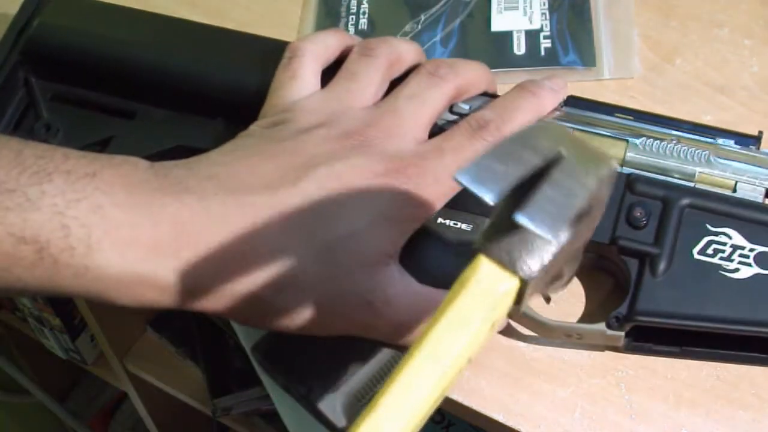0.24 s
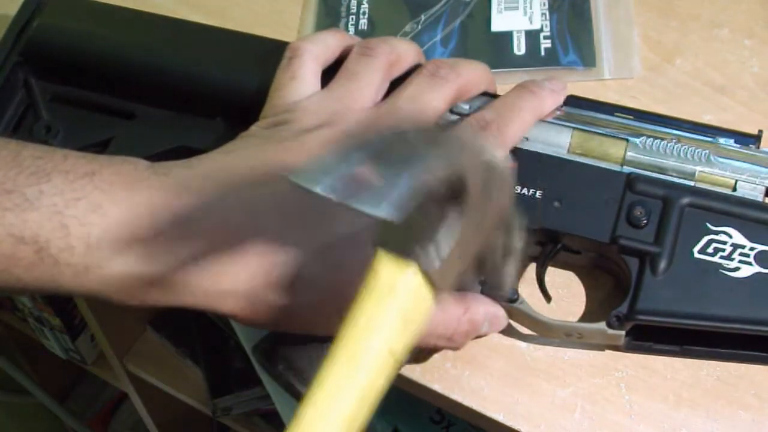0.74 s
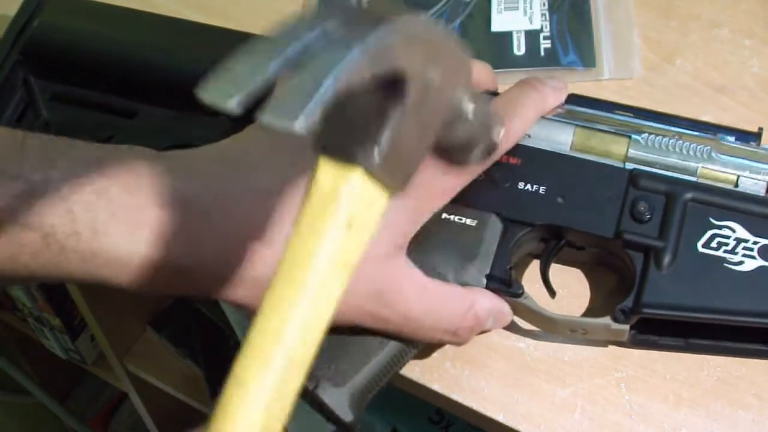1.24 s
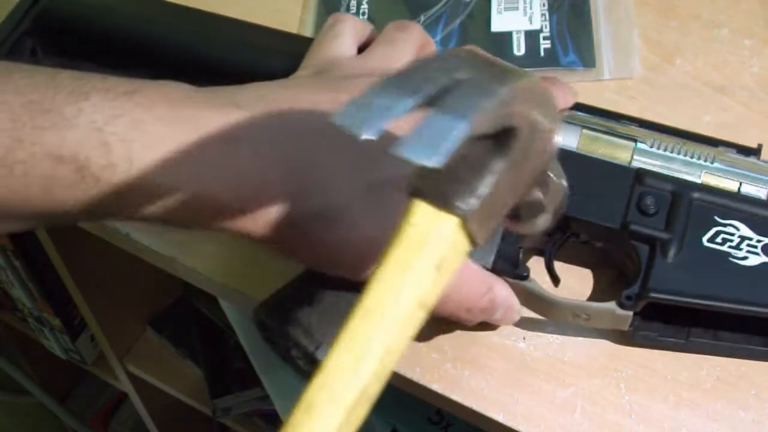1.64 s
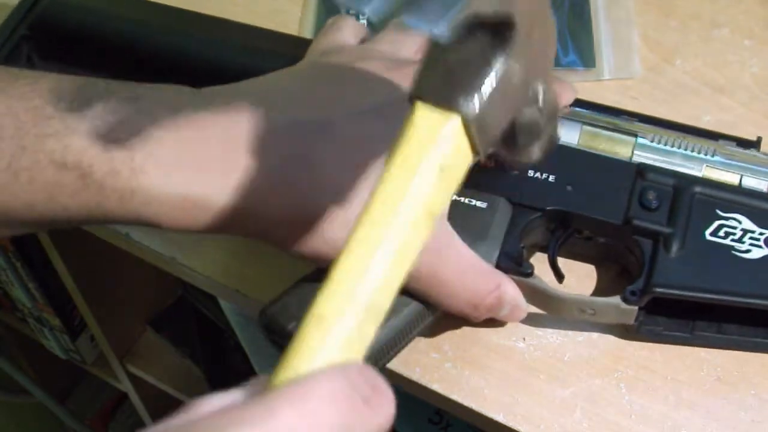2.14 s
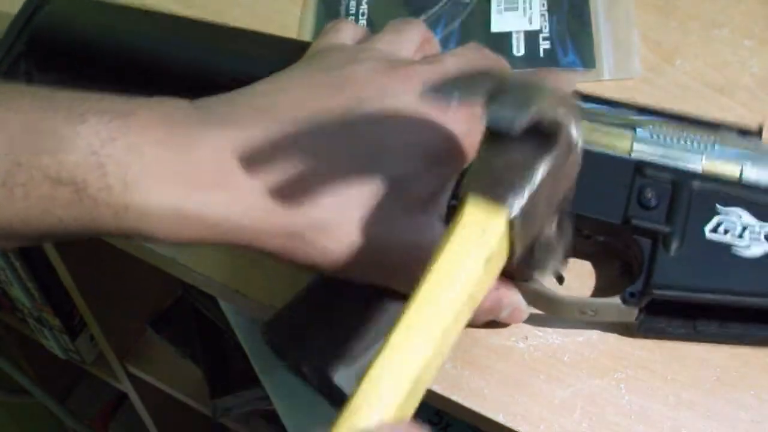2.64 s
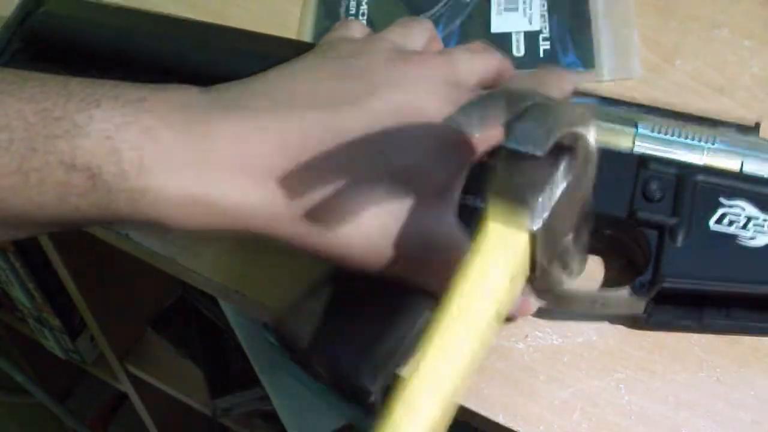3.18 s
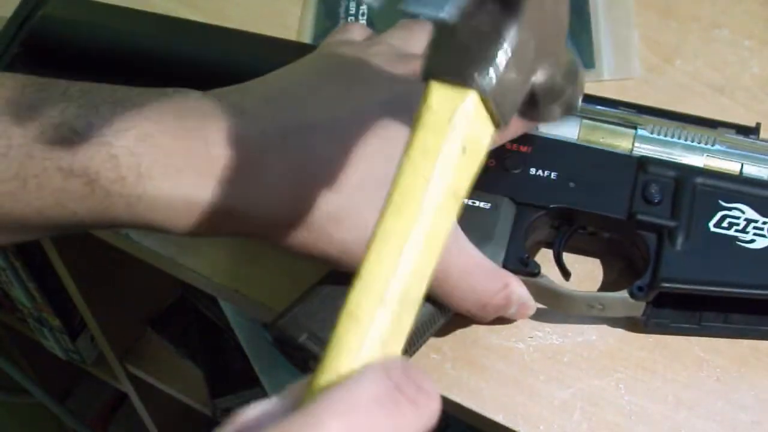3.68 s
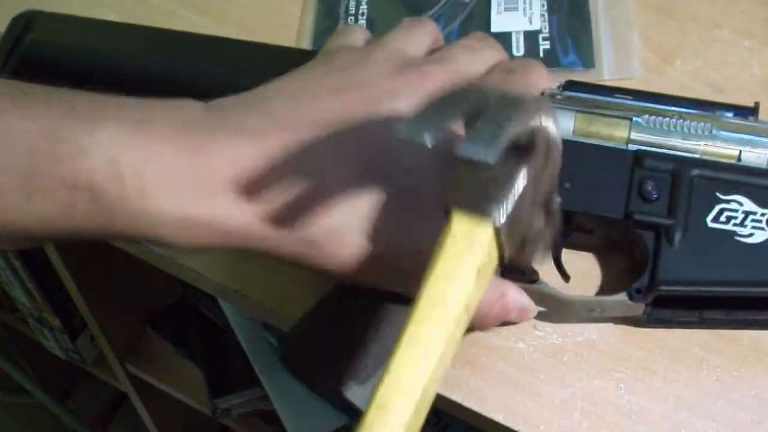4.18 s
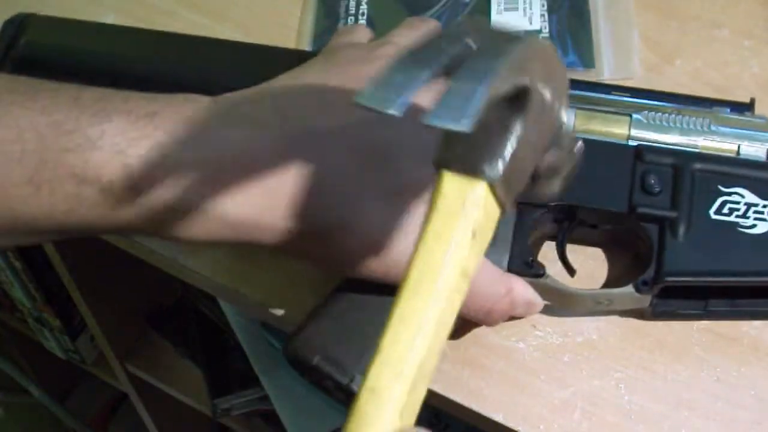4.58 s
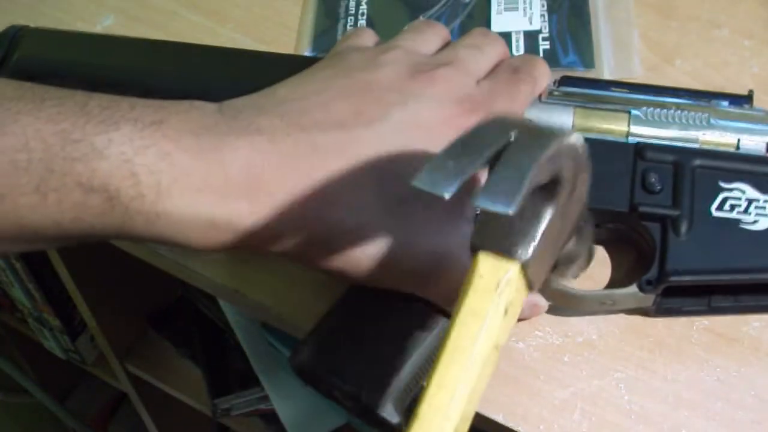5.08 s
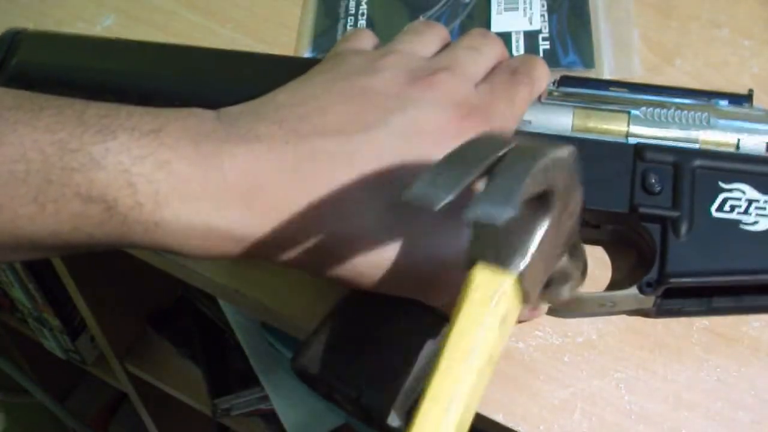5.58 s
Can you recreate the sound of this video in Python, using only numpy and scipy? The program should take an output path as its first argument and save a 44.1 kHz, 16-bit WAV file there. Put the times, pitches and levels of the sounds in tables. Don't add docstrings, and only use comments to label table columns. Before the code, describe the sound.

Close to the microphone in a small room, faint fingertip bumps shift a plastic housing on a wooden bench over low rumble and very faint electronic whine. At 0.4 s a hammer taps a small pin, then again at 0.7 and a heavier 1.0 s: dull hollow clatter with a low bench thump. A clackier blow comes at 1.35, then a pause with tiny handling knocks. Softer taps resume at 1.9 and continue every 0.3 s, turning sharper and more squarely struck from 3.1 s. After 3.6 s the steel rings harder. Blows at 4.1 and 4.4 have less plastic body but longer rattling tails; from 4.7 to 5.5 s come the loudest, fullest cracks, slightly overloaded, and a somewhat lighter last one at 5.8. Most strikes are followed within a tenth of a second by a softer plastic rebound. Tails are short, with a slight room ring.

```python
import sys
import numpy as np
from scipy import signal
from scipy.fft import rfft, irfft
from scipy.io import wavfile
from scipy.ndimage import uniform_filter1d

SR = 44100
rng = np.random.default_rng(int(sys.argv[2]) if len(sys.argv) > 2 else 0)


def convert_level_to_amplitude(level_db):
    exponent = np.asarray(level_db, float) / 20
    return 10 ** exponent


def wav_record(signal):
    frames = np.transpose(np.atleast_2d(signal))
    bounded = np.clip(frames, -1, 1)
    quanta = np.round(bounded * 32767).astype(np.int16)
    wavfile.write(sys.argv[1], SR, quanta)


N = 256662

# pitch_hz, width_hz, level_db
HOUSING_MODES = [(1049, 270, -2), (1286, 140, -4.5), (1622, 360, -5), (1974, 170, 0), (2317, 207, 2),
                 (2628, 84, -1.5), (2948, 270, -7), (3415, 450, -19.5), (4274, 290, -29.5)]
LOOSE_MODES = [(5630, 360, -0.5), (6670, 390, -1), (7920, 510, 0), (8300, 200, -4), (10200, 2200, -11.5),
               (12100, 2300, -20.5)]
CLACK_MODES = [(1500, 2700, -7.5), (2578, 370, 2.7)]


def hammer():
    # start_s, clatter_db (force), clack_db (how squarely the face meets the pin),
    # boom_db (bench), trail_db (dying rattle)
    blows = [(0.4255, -10.5, -31.5, -6, -18.5), (0.7155, -3.5, -26.5, -3.5, -17.5),
             (1.0309, 0.5, -18.5, -2, -26), (1.3571, -9.5, -8, -10, -19), (1.9157, -13.5, -32.5, -5, -10.5),
             (2.2322, -12, -25.5, -6.5, -15), (2.5328, -11, -13.5, -3, -12), (2.83, -9, -14.5, -4.5, -21.5),
             (3.1358, -12, 1, -4, -19.5), (3.4419, -10.5, -3.5, -3, -18.5), (3.7703, -9.5, -6.5, -3, -20),
             (4.0863, -15.5, -6, -6, -1), (4.3716, -16, -4, -6.5, -6.5), (4.668, -1, -5.5, -1.5, -14.5),
             (4.9452, 0, -5.5, 1, -13), (5.212, -2.5, -3, -2, -17), (5.4905, -1, -6.5, -3.5, -28),
             (5.7764, -4.5, -9, -7, -18)]
    # pitch_hz, width_hz, level_db
    steel_modes = [(4540, 500, -20.5), (6300, 760, -12), (7500, 1200, 3), (7800, 300, -7),
                   (11000, 1600, -11), (13000, 4700, -15.5)]
    # pitch_hz, width_hz, level_db
    knock_modes = [(189, 180, -14.5), (250, 42, -6.5), (340.3, 70, -1.06), (422.6, 99, -6), (490.3, 69, -2),
                   (603, 150, -2), (646, 210, -16.5), (867, 100, -11.5)]
    bench_hz, sag_hz_per_db = 117.3, 0.1
    seated_s, seated_db = 3.6, 5.5
    lands_s = 0.004027
    length_s = 0.011
    out = np.zeros(N)
    for s, clatter_db, clack_db, boom_db, trail_db in blows:
        tick_db = -10.5 + 0.11 * clack_db + 0.15 * clatter_db + seated_db * (s > seated_s)
        loose_db = -19.5 + 0.34 * clack_db
        knock_db = -4.5 + 0.66 * clatter_db

        short = dict(per_s=9200, after_db=-17, after=0.0087, under_db=-37)
        add(out, s, rattle(steel_modes, tick_db + 17.5, 0.00068, 0.00007, **short))
        add(out, s, rattle(CLACK_MODES, clack_db + 19, 0.00088, 0.00031, **short))

        loose = dict(start=0.14, after_db=-3.5, after=0.015, late=0.042, lumps_db=1.0)
        add(out, s, rattle(LOOSE_MODES, loose_db + 25.5, length_s, 0.0036, **loose))
        shell = dict(start=0.11, after_db=trail_db + 7.5, lumps_db=2.5)
        add(out, s, rattle(HOUSING_MODES, clatter_db + 29, length_s, 0.006, **shell))

        add(out, s + lands_s, convert_level_to_amplitude(knock_db + 25) * ring(knock_modes, 0.023, 1.8))
        knocks = dict(after_db=trail_db + 4.5, after=0.02, late=0.029)
        add(out, s + 0.001, rattle(knock_modes, knock_db + 27.5, 0.69 * length_s, 0.0097, **knocks))
        add(out, s, boom(boom_db - 0.7, bench_hz - sag_hz_per_db * (clatter_db + 10)))
    return out


def hops():
    # start_s, clatter_db, knock_db,
    # treble_db
    landings = [(0.776, -35, -46, -52), (1.08, -20, -37, -35), (1.118, -22, -65, -42),
                (1.424, -25.5, -25.5, -37), (1.962, -30, -21.5, -66), (2.312, -20.5, -21.5, -38.5),
                (2.6142, -21.5, -21, -42), (2.908, -23.5, -32, -40.5), (3.2101, -21.5, -22.5, -47.5),
                (3.508, -20, -22.5, -32), (3.838, -28.5, -22.5, -39), (4.134, -14, -70, -29),
                (4.414, -15.5, -29.5, -50), (4.6407, -28, -20.5, -48), (5, -9, -25.5, -38),
                (5.2477, -9, -35, -42.5), (5.5513, -21.5, -35, -61)]
    # start_s, clatter_db, knock_db
    touches = [(.016, -49, -38), (.078, -47, -49), (.168, -39.5, -27.5), (0.203, -57.5, -36),
               (.238, -58, -36.5), (1.5395, -31.5, -25), (1.5803, -57, -29), (1.758, -50, -35.5),
               (1.783, -43.5, -35.5), (2.0467, -38, -59), (2.173, -37.5, -38), (4.535, -55, -32.5),
               (4.589, -49, -31.5), (4.858, -32, -25.5)]
    # pitch_hz, width_hz, level_db
    thud_modes = [(207, 79, -4), (243, 30, -2.5), (293, 70, -5), (377, 95, -9), (464, 230, -9),
                  (480, 310, -13.5), (627, 140, -4), (870, 330, -14)]
    length_s = 0.0075
    edge_hz = 125
    out = np.zeros(N)
    rows = [(*row, -9.5, 9, 8) for row in landings]
    rows += [(*row, -66, -28.5, -6, 5) for row in touches]
    for s, clatter_db, knock_db, treble_db, boom_db, click_db, reach in rows:
        s = s + 0.003
        soft = dict(start=0.3, per_s=1600, spread_db=5.0, under_db=-24)
        add(out, s, rattle(HOUSING_MODES, clatter_db + 17.5, length_s, 0.0027,
                           after_db=-12.5, after=0.044, **soft))
        add(out, s + 0.001, rattle(CLACK_MODES, clatter_db + click_db, 0.0012, 0.0003,
                                   per_s=7200, after_db=-21.5, after=0.0025, under_db=-32))
        add(out, s, rattle(thud_modes[:reach], knock_db + 21, 1.8 * length_s, 0.0031,
                           after_db=-5.5, after=0.01, **soft))
        add(out, s, rattle(LOOSE_MODES[:4], treble_db + 16.5, length_s, 0.003,
                           after_db=0.0, after=0.016, **soft))
        add(out, s + 0.0049, boom(boom_db + 0.19 * knock_db - 9.5, edge_hz))
    return out


def boom(db, top_hz):
    # pitch_hz, level_db, t60_s (time to fade 60 dB)
    frame_modes = [(67.1, -.6, .29), (85.8, -4.2, .36), (135, -11, .36)]
    swell_s = 0.0064
    legs_hz, legs_db, legs_t60 = 44.6, -21, 0.27
    t = np.arange(int(0.45 * SR)) / SR
    top = np.sin(2 * np.pi * top_hz * t) * t / swell_s * np.exp(1 - t / swell_s)
    frame = np.zeros(len(t))
    for hz, mode_db, t60 in frame_modes:
        frame += convert_level_to_amplitude(mode_db - 60 * t / t60) * np.sin(2 * np.pi * hz * t)
    shaken_frame = convert_level_to_amplitude(42.5) / SR * signal.fftconvolve(top, frame)[:len(t)]
    legs = convert_level_to_amplitude(legs_db - 60 * t / legs_t60) * np.sin(2 * np.pi * legs_hz * t)
    return convert_level_to_amplitude(db) * (top - shaken_frame + legs)


def rattle(modes, db, length_s, rise_s, **shape):
    return convert_level_to_amplitude(db) * signal.fftconvolve(chatter(length_s, rise_s, **shape), ring(modes, 0.015, 1.5))


def chatter(length_s, rise_s, start=0.27, per_s=4000, spread_db=0.5, after=0.017, after_db=-10,
            late=0.052, under_db=-14, lumps_db=2.0):
    t = np.arange(int(0.3 * SR)) / SR
    noise = rng.standard_normal(len(t))
    sizes = convert_level_to_amplitude(spread_db * rng.exponential(1, len(t)))
    hits = noise * sizes * (rng.random(len(t)) < per_s / SR)
    plateau = 1 / (1 + np.exp(np.clip((t - length_s) / 0.0009, -50, 50)))

    since = np.maximum(t - length_s, 0)
    trail = convert_level_to_amplitude(after_db) * (np.exp(-since / after) + convert_level_to_amplitude(under_db) * np.exp(-since / late))
    clumps = uniform_filter1d(uniform_filter1d(rng.standard_normal(len(t)), size=300), size=300)
    trail *= convert_level_to_amplitude(lumps_db * evened(clumps))

    swell = np.minimum(t / rise_s + start, 1)
    out = (evened(hits + 1e-9) * plateau + noise * trail) * swell
    return out / np.linalg.norm(out)


def ring(modes, detune, uneven_db):
    hz = np.fft.rfftfreq(4096, 1 / SR)
    shift, change = rng.standard_normal((2, len(modes)))
    power = np.zeros(len(hz))
    for k, (f, width, db) in enumerate(modes):
        away = 2 * (hz - f * (1 + detune * shift[k])) / (1.555 * width)
        power += convert_level_to_amplitude(2 * (db + uneven_db * change[k])) / (1 + away ** 2) ** 2
    cepstrum = irfft(np.log(power + 1e-10) / 2)
    cepstrum[1:2048] *= 2
    cepstrum[2049:] = 0
    out = irfft(np.exp(rfft(cepstrum)))[:2048]
    return out / np.linalg.norm(out)


def room(x):
    # pitch_hz, t60_s
    fade_times = [(60, 0.13), (160, 0.11), (420, 0.52), (1100, 0.29), (2900, 0.28), (5000, 0.25),
                  (8000, 0.083), (14000, 0.056)]
    # pitch_hz, level_db
    colour = [(60, -13.5), (160, 14.5), (420, -2.7), (1100, 0), (2500, -7), (4500, 3), (8000, -5),
              (14000, -20)]
    out = np.zeros(N)
    turn = np.floor(np.arange(N) / SR / 0.3 + 0.8) % 3
    for k in range(3):
        taps = np.zeros(SR // 2)
        at = np.arange(160, len(taps) - 20, 20)
        taps[at + rng.integers(0, 20, len(at))] = rng.choice([-1., 1.], len(at))
        hz, t, z = signal.stft(taps, SR, nperseg=512, noverlap=384)
        z = z * convert_level_to_amplitude(read(colour, hz)[:, None] - 60 * t / read(fade_times, hz)[:, None])
        tail = signal.istft(z, SR, nperseg=512, noverlap=384)[1]
        out += signal.fftconvolve(x * (turn == k), tail / np.linalg.norm(tail))[:N]
    return out


def hush():
    # pitch_hz, level_db (per Hz)
    tone_colour = [(8.8, -16), (28, 11), (43, 2), (136, -15), (203, -24), (328, -18), (411, -28.5),
                   (594, -31.5), (789, -32.5), (1240, -30), (1900, -34), (4560, -45), (9800, -42.5),
                   (11300, -48), (13000, -48)]
    # time_s, level_db
    hand_sway = [
        (0, -43.5),
        (.6, -43.5),
        (1.4, -48.5),
        (2.7, -40),
        (4.0, -39),
        (4.35, -49),
        (4.699, -39),
        (5.82, -48.5),
    ]
    level_db, top_hz = -41, 15800
    frames, hz = N // 512 + 5, np.fft.rfftfreq(2048, 1 / SR)
    a, b, patches = rng.standard_normal((frames, 1025, 3)).T
    noise = a + 1j * b
    patches = evened(uniform_filter1d(uniform_filter1d(patches, 20, 0), 6, 1))
    field_db = read(tone_colour, hz)[:, None] + patches - 40 * (hz[:, None] > top_hz)
    plain = signal.istft(noise * convert_level_to_amplitude(field_db), nperseg=2048, noverlap=1536)[1]
    level = np.sqrt(np.mean(plain ** 2))
    sway_db = np.interp(np.arange(frames) * 512 / SR, *np.transpose(hand_sway)) + 3.9 - level_db
    field_db = field_db + sway_db / (1 + (hz[:, None] / 200) ** 4)
    swaying = signal.istft(noise * convert_level_to_amplitude(field_db), nperseg=2048, noverlap=1536)[1]
    return convert_level_to_amplitude(level_db) / level * swaying[:N]


def whine():
    # pitch_hz, level_db, width_hz
    lines = [(9030, -75, 15), (10700, -73, 1100), (11365, -70, 6), (11396, -80, 20), (15300, -84, 12),
             (119, -52, 6), (62, -46, 8)]
    out, t = np.zeros(N), np.arange(N) / SR
    for hz, db, width in lines:
        r = np.exp(-np.pi * width / SR)
        slow = rng.standard_normal(N) + 1j * rng.standard_normal(N)
        for _ in range(3):
            slow = signal.lfilter([1 - r], [1, -r], slow)
        steady = 12 / width * np.std(slow)
        out += convert_level_to_amplitude(db) * evened(((slow + steady) * np.exp(2j * np.pi * hz * t)).real)
    return out


def evened(x):
    return x / np.sqrt(np.mean(x ** 2) + 1e-20)


def read(points, hz):
    f, value = np.transpose(points)
    return np.interp(np.log(hz + 1), np.log(f + 1), value)


def add(mix, s, sound):
    part = mix[round(s * SR):][:len(sound)]
    part += sound[:len(part)]


def scene():
    near = hammer() + hops()
    return (near + convert_level_to_amplitude(-19.5) * room(near) + hush() + whine())[None]


def top_cut(x):
    return signal.sosfilt(signal.butter(12, 16310, fs=SR, output="sos"), x)


def record(dry):
    edge_hz, gate_hz, gate_db = 16200, 13800, -70
    power_db = 10 * np.log10(abs(uniform_filter1d((dry ** 2).mean(0), 800, origin=399)) + 1e-12)
    fall = np.arange(N) * 60. / SR
    over_db = np.maximum(np.maximum.accumulate(power_db + fall) - fall + 23.5, 0)
    ducked = dry / convert_level_to_amplitude(0.15 * uniform_filter1d(over_db, 600, origin=299))

    knee, ceiling = 9.0, 1.0
    clipped = ducked / (1 + abs(ducked / ceiling) ** knee) ** (1 / knee)
    low_pass = signal.firwin(255, edge_hz, window=("kaiser", 9), fs=SR)
    limited = signal.oaconvolve(clipped, low_pass[None], "same")

    high_pass = signal.firwin(511, gate_hz, pass_zero=False, fs=SR)
    top = signal.oaconvolve(limited, high_pass[None], "same")
    heard = uniform_filter1d(top ** 2, size=1024) > convert_level_to_amplitude(2 * gate_db)
    heard = np.maximum(heard, 0.7 * (over_db <= 0))
    gated = limited - top * (1 - uniform_filter1d(heard * 1., size=512))
    return top_cut(gated)


dry = scene()
out = record(dry)
wav_record(out)
```